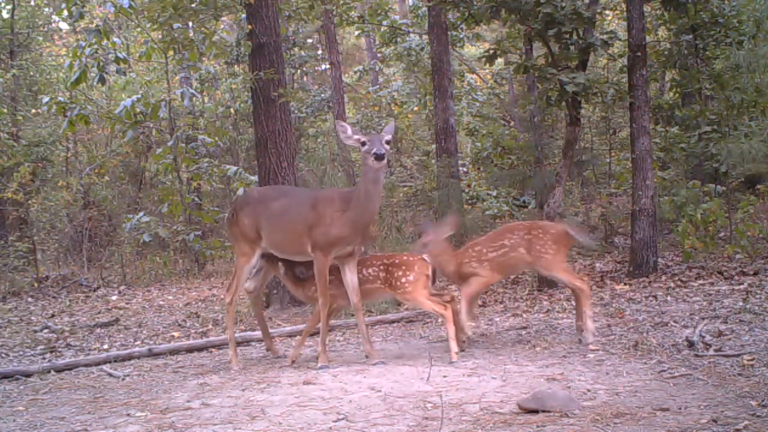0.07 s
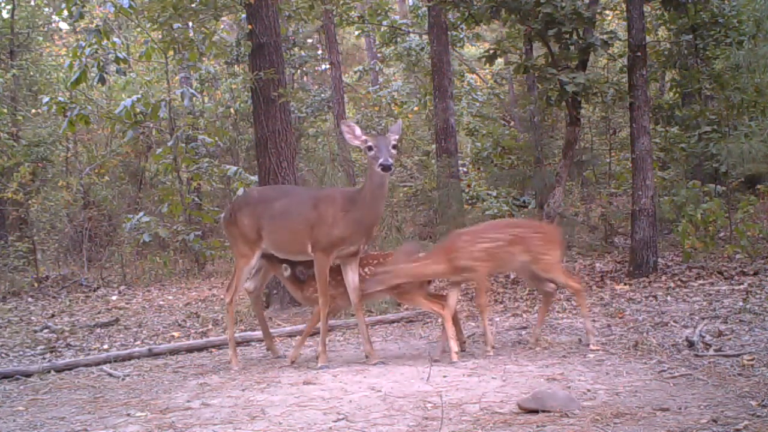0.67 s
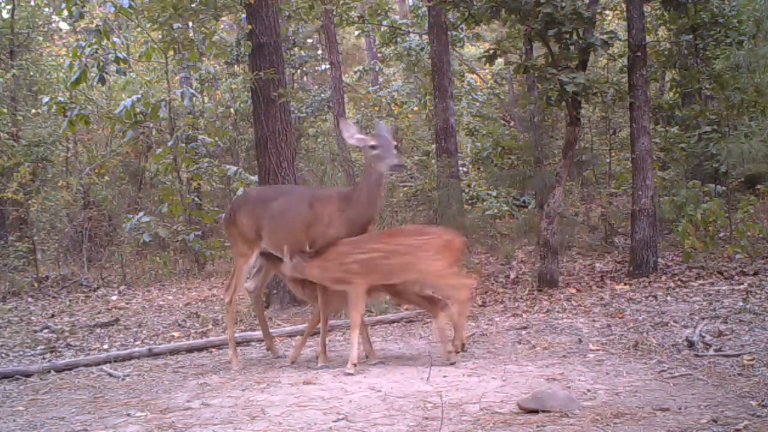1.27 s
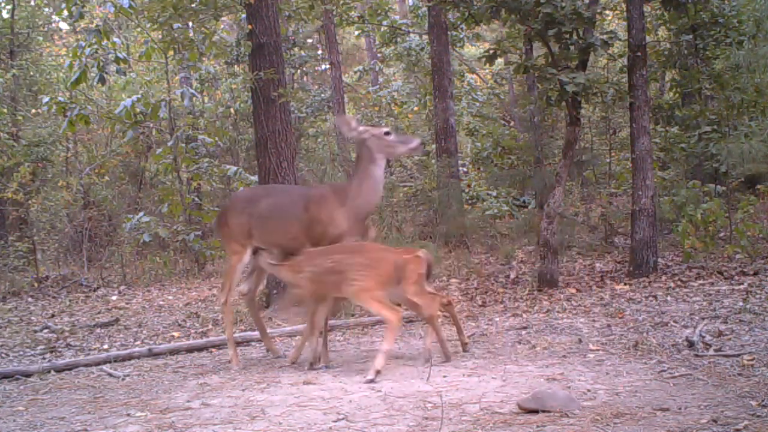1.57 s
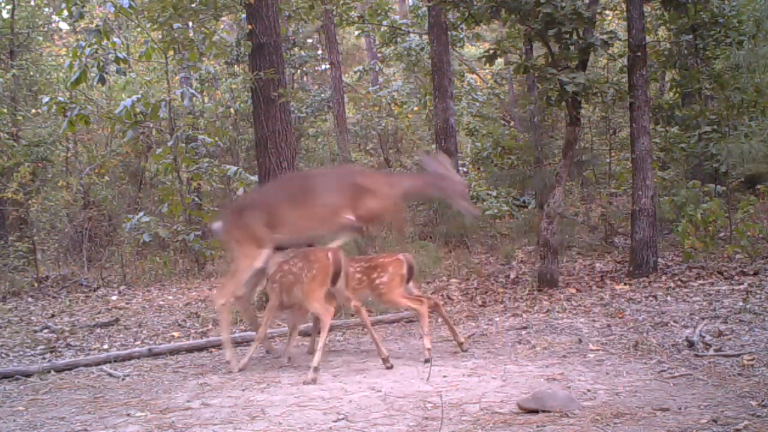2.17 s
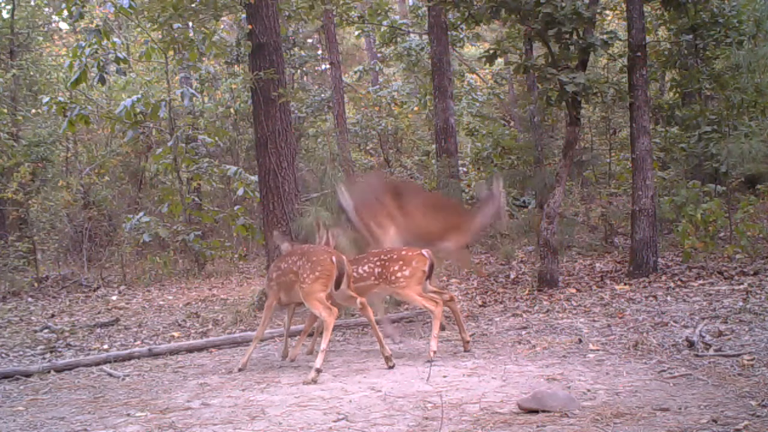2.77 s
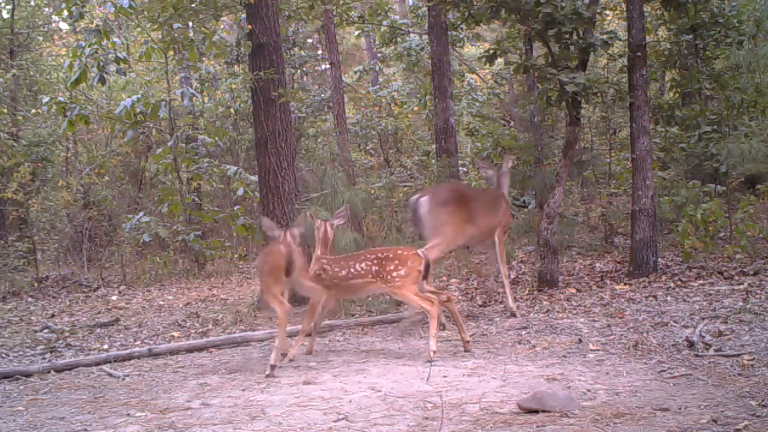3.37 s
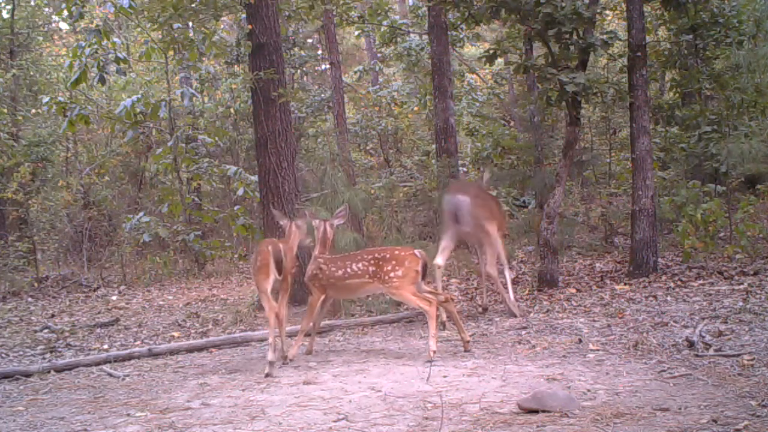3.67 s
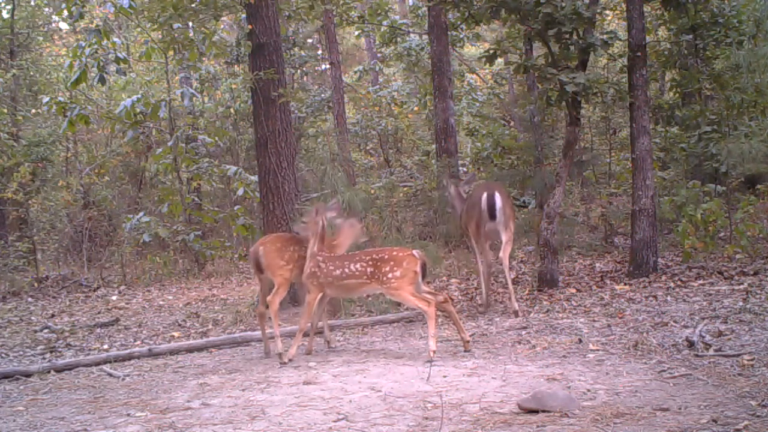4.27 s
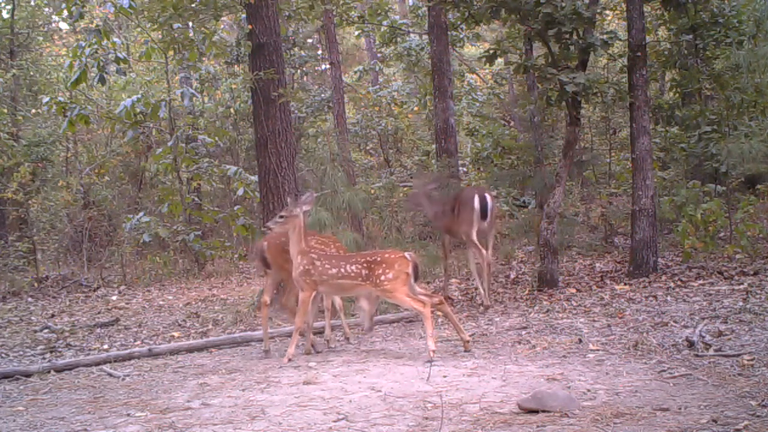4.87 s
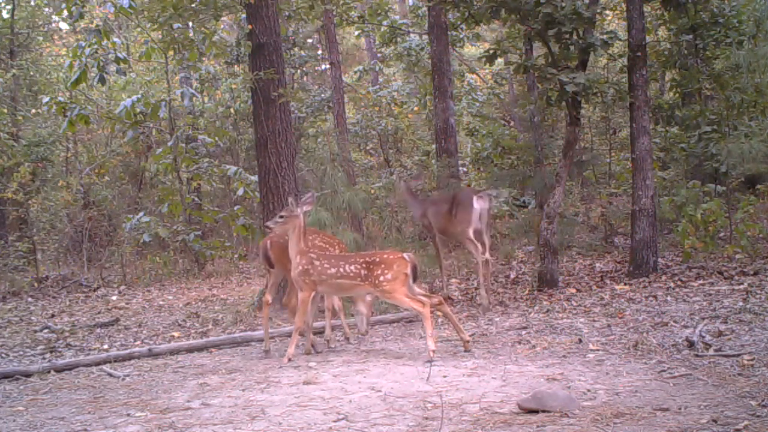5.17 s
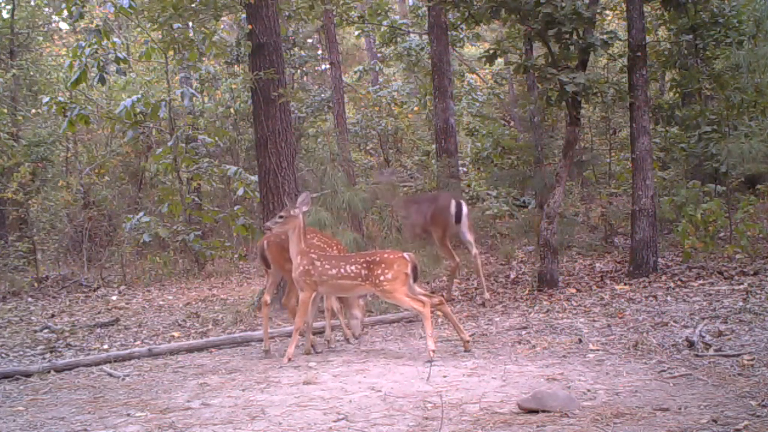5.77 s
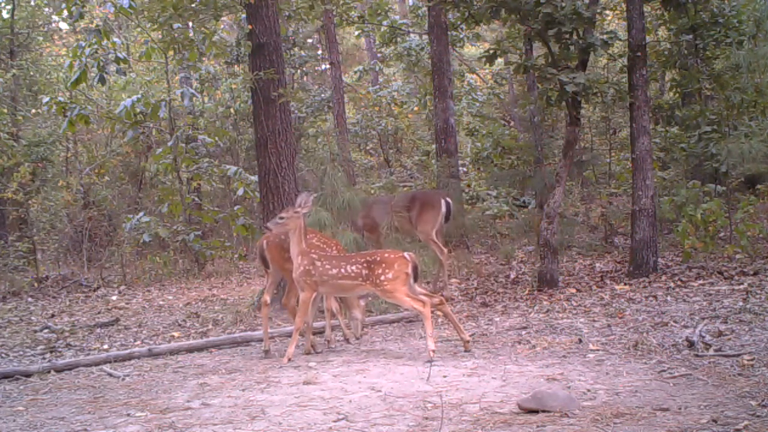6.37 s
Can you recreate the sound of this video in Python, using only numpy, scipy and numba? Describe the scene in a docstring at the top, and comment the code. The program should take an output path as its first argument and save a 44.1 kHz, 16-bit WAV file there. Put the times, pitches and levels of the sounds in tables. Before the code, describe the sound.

Nursing fawns smack softly and a doe steps through dry leaves, while a small bird chirps and a cicada pulses over woodland hiss.

```python
"""A woodland edge, heard by one distant microphone: a doe and two nursing fawns.
The fawns smack as suction lets go and mew softly; the doe steps away, crumpling dry leaves and
snapping stalks. A small bird whistles among the trunks. A cicada's buckling tymbal rings its body
in falling sweeps that grow louder, over a chorus of far insects, a low rumble and a hiss."""
import sys
import numpy as np
from scipy import signal
from scipy.fft import rfft, irfft
from scipy.io import wavfile
from scipy.ndimage import uniform_filter1d
from numba import njit

SR = 44100
rng = np.random.default_rng(int(sys.argv[2]) if len(sys.argv) > 2 else 0)


def log_audio(samples):
    """Write samples as a 16-bit WAV file to the path given in sys.argv[1]."""
    # one column per channel
    frames = np.atleast_2d(samples).T
    # limit to full scale, then quantise
    limited = np.clip(frames, -1, 1)
    pcm = np.round(limited * 32767).astype(np.int16)
    wavfile.write(sys.argv[1], SR, pcm)


N = 287973
T = np.arange(N) / SR
TOP_HZ = 15700


def undb(db):
    """Decibels to gain."""
    return 10 ** (np.asarray(db) / 20)


def unit(x):
    """Scale to rms 1."""
    return x / np.sqrt(np.mean(x ** 2))


def colour(x, spectrum):
    """Shape x by (f/Hz, gain/dB) points, rolled off below the first; rms 1."""
    hz, db = np.transpose(spectrum)
    bins_hz = np.arange(N // 2 + 1) * SR / N + 1e-3
    gain = undb(np.interp(np.log(bins_hz), np.log(hz), db))
    rolloff = np.minimum(bins_hz / hz[0], 1) ** 2
    return unit(irfft(rfft(x) * gain * rolloff, N))


def wander(rate_hz):
    """Random values joined by ramps; rms 1."""
    span = int(SR / rate_hz)
    stairs = np.repeat(rng.standard_normal(N // span + 1), span)
    return unit(uniform_filter1d(stairs, span)[:N])


@njit
def bandpass(x, hz, width_hz):
    """State-variable band-pass with a centre per sample."""
    y, band, low = np.empty(len(x)), 0., 0.
    for i in range(len(x)):
        g, damping = np.tan(np.pi * hz[i] / SR), width_hz / hz[i]
        v = (band + g * (x[i] + 1e-18 - low)) / (1 + g * (g + damping))
        band, low = 2 * v - band, low + 2 * g * v
        y[i] = damping * v
    return y


def resonate(x, hz, width_hz):
    """Steep resonance, steady or moving: two band-passes in series, each width_hz wide."""
    centre_hz = np.full(len(x), hz, dtype=float)
    once = bandpass(x, centre_hz, float(width_hz))
    return bandpass(once, centre_hz, float(width_hz))


def add_burst(out, start_s, peak_db, burst):
    """Mix a burst into out, scaled to peak_db."""
    i = int(start_s * SR)
    out[i:i + len(burst)] += undb(peak_db) * burst[:N - i] / np.abs(burst).max()


def swells(rows):
    """Gain of Gaussian swells summed in power; rows: peak t/s, level/dB, rise/s, fall/s."""
    power = np.zeros(N)
    for peak_s, db, rise_s, fall_s in rows:
        distance = (T - peak_s) / np.where(T < peak_s, rise_s, fall_s)
        power += undb(2 * db) * np.exp(-np.minimum(distance ** 2, 40))
    return np.sqrt(power)


def fade_db(age_s, hold_s, sag_db_per_s, release_db_per_s):
    """Level of a note that sags while held, then drops fast."""
    return -sag_db_per_s * np.clip(age_s, 0, hold_s) - release_db_per_s * np.maximum(age_s - hold_s, 0)


def crackle(rate_hz, spread_db):
    """Clicks at random moments, a few larger than the rest."""
    size = undb(spread_db * np.minimum(rng.exponential(size=N), 4))
    return (rng.random(N) < rate_hz / SR) * size * rng.choice([-1, 1], N)


def woods(x, wet_db, t60_s):
    """Trunks and leaves add a dying wash of echoes."""
    t = T[:SR // 2]
    envelope = np.exp(-np.log(1000) * t / t60_s) * (1 - np.exp(-t / 0.0046))
    echoes = rng.standard_normal(len(t)) * envelope
    return x + undb(wet_db) * signal.fftconvolve(x, echoes / np.linalg.norm(echoes))[:N]


# Rumble spectrum: f/Hz, relative level/dB
RUMBLE_SPECTRUM = [(22, 1.6), (55, -1), (80, -6), (125, -9), (175, -15), (235, -20), (320, -26.5),
                   (500, -28), (750, -31), (1100, -34), (2000, -37), (3000, -39.5), (6000, -70)]
# Hiss spectrum: f/Hz, relative level/dB
HISS_SPECTRUM = [(1000, -26), (2400, 3.5), (6000, 5.5), (8500, 0.5), (12000, -0.5), (14500, -1),
                 (15700, -11)]


def air():
    """Still air: a low rumble and an even hiss."""
    rumble = undb(-39) * colour(rng.standard_normal(N), RUMBLE_SPECTRUM)
    hiss = undb(-58) * colour(rng.standard_normal(N), HISS_SPECTRUM)
    return rumble + hiss


# Drone envelope: t/s, level/dB
DRONE_LEVELS = [(0, -46), (2, -46.5), (3.4, -50.5), (4.3, -43), (5.6, -47), (6.2, -41.5)]
# Drone resonances: f/Hz, stage half-width/Hz, relative level/dB
DRONE_MODES = [(96.7, 16.9, 2.5), (115.5, 12.5, -3), (138.3, 14.8, -3), (210, 33, -12.5)]


def drone():
    """A far bass drone slowly sinks and swells."""
    modes = sum(undb(db) * unit(resonate(rng.standard_normal(N), hz, 2 * half_width_hz))
                for hz, half_width_hz, db in DRONE_MODES)
    times_s, levels_db = np.transpose(DRONE_LEVELS)
    return unit(modes) * undb(np.interp(T, times_s, levels_db))


# Far insect spectrum: f/Hz, relative level/dB
CHORUS_SPECTRUM = [(2500, -28), (2820, -7), (3020, -4.5), (3430, 2), (3830, -3), (4100, -2.5), (4550, -1),
                   (5100, 0.5), (5450, -2), (5750, -4), (6600, -9.5), (8000, -17)]


def chorus():
    """Far insects blur into a band of ticks; a few narrow voices swell and fade within it."""
    ticks = colour(crackle(rate_hz=14000, spread_db=1), CHORUS_SPECTRUM) * undb(0.73 * wander(25))
    voices = sum(unit(resonate(rng.standard_normal(N), hz, width_hz=90)) * undb(2 * wander(5))
                 for hz in (3102, 3473, 3670, 3860, 4057, 4166, 5130, 5430))
    steady_db, swell_from_s, swell_db_per_s = -53, 3.6, 1.34
    level_db = steady_db + swell_db_per_s * np.maximum(T - swell_from_s, 0)
    return (ticks + undb(-7) * unit(voices)) * undb(level_db)


# Cicada sweeps, about 0.8 s apart: t/s, nominal level/dB, closing hum level/dB
SWEEPS = [(.2, -71, -63), (1.04, -57, -59), (1.92, -65, -59.5), (2.72, -72, -58), (3.485, -53.5, -60),
          (4.262, -52, -58.5), (5.075, -48, -64), (5.886, -45.5, -66)]
TYMBAL_HZ, CLOSING_HUM_HZ = 182.8, 2992
SWEEP_FROM_HZ, SWEEP_TO_HZ, SLIDE_MIDDLE_S, SLIDE_S = 5480, 3810, 0.019, 0.014
SWEEP_OVERSHOOT_DB, SWEEP_ATTACK_DB_PER_S = 1, 378


def cicada():
    """A tymbal buckles in and out; its clicks ring a body whose resonance sinks, ending on a hum."""
    phase = 2 * np.pi * np.cumsum(TYMBAL_HZ * (1 + 0.0015 * wander(40))) / SR
    # In and out clicks have opposite signs, so odd harmonics lead.
    clicks = unit(sum((1 if k % 2 else 0.55) * np.cos(k * phase) for k in range(14, 33)))
    rasp = rng.standard_normal(N)
    sweeps = np.zeros(N)
    for at_s, db, _ in SWEEPS:
        active = (T > at_s - 0.1) & (T < at_s + 0.2)
        age_s = T[active] - at_s
        slide = 1 / (1 + np.exp((age_s - SLIDE_MIDDLE_S) / SLIDE_S))
        body_hz = SWEEP_TO_HZ + (SWEEP_FROM_HZ - SWEEP_TO_HZ) * slide
        hold_s = 0.1 * 2 ** ((db + 48) / 15)  # doubles per 15 dB
        effort_db = SWEEP_OVERSHOOT_DB + SWEEP_ATTACK_DB_PER_S * np.minimum(age_s, 0)
        effort_db += fade_db(age_s, hold_s, sag_db_per_s=70, release_db_per_s=450)
        # Buckling starts ragged, then locks to a steady beat.
        locked = np.clip((age_s + 0.016) / 0.056, 0, 1)
        drive = locked * clicks[active] + (1.7 - 1.3 * locked) * rasp[active]
        sweeps[active] += unit(resonate(drive, body_hz, width_hz=1360)) * undb(db + effort_db)
    low_mode = unit(resonate(clicks + 0.3 * rasp, hz=3200, width_hz=530))
    low_mode *= swells([(at_s + 0.095, db - 7, 0.03, 0.035) for at_s, db, _ in SWEEPS])
    hum_phase = 2 * np.pi * np.cumsum(CLOSING_HUM_HZ + 9 * wander(60)) / SR
    hum = unit(np.sin(hum_phase) * undb(2 * wander(40)))
    hum *= swells([(at_s + 0.24, hum_db, 0.055, 0.05) for at_s, _, hum_db in SWEEPS])
    return woods(sweeps + low_mode + hum, wet_db=-3.5, t60_s=0.45)


# Bird calls: onset t/s, level/dB, ratio to base pitch
CHIRPS = [(2.095, -44, 1.005), (3.066, -45, 0.985), (4.405, -50, 1.01), (5.125, -50.5, .985),
          (6.035, -53, 0.99)]
BASE_FROM_HZ, BASE_TO_HZ, SLUR_S, CHIRP_ATTACK_S = 5850, 7270, 0.0105, 0.0042
QUAVER_RATE_HZ, QUAVER_DEPTH_HZ = 130, 350


def bird():
    """A thin whistle slurs up and breaks into a fast quaver, smeared by the trees."""
    out = np.zeros(N)
    quaver_phase = 2 * np.pi * np.cumsum(QUAVER_RATE_HZ * (1 + 0.1346 * wander(60))) / SR
    quaver = np.sin(quaver_phase) + 0.4 * wander(400)
    for start_s, db, ratio in CHIRPS:
        age_s = np.maximum(T - start_s, 0)
        base_hz = BASE_TO_HZ + (BASE_FROM_HZ - BASE_TO_HZ) * np.exp(-age_s / SLUR_S)
        quaver_onset = np.clip((age_s - 0.012) / 0.0275, 0, 1)
        pitch_hz = ratio * base_hz + QUAVER_DEPTH_HZ * quaver_onset * quaver
        attack = np.minimum(age_s / CHIRP_ATTACK_S, 1)
        level_db = db + fade_db(age_s, hold_s=0.08, sag_db_per_s=59, release_db_per_s=380)
        out += np.sin(2 * np.pi * np.cumsum(pitch_hz) / SR) * attack * undb(level_db)
    return woods(out, wet_db=0.5, t60_s=0.7)


# Hooves on bare soil: peak t/s, level/dB, rise/s, fall/s
THUDS = [(1.97, -57.5, 0.043, 0.055), (3.49, -53.5, 0.015, 0.02)]


def hoof_thuds():
    """Packed earth answers a hoof with a dull scuff."""
    return unit(resonate(rng.standard_normal(N), hz=480, width_hz=220)) * swells(THUDS)


# Hooves on dry leaves: peak t/s, level/dB, length/s
STEPS = [(0.032, -56, 0.025), (.605, -58, .045), (.95, -59, 0.032), (1.77, -59, .07), (2.155, -54, .045),
         (2.36, -58, 0.11), (2.51, -57.5, .11), (2.944, -51, 0.039), (3.018, -54, .045), (3.438, -52, .05),
         (3.655, -54, .045), (3.705, -53, .024), (4.055, -51.5, .05), (4.288, -54, .085), (4.575, -55, .06),
         (4.655, -48.5, 0.026), (4.695, -52, .03), (4.897, -48.5, .055), (5.262, -46, 0.056),
         (5.564, -50.5, .07), (5.915, -49.5, .042), (5.985, -51.5, .07), (6.29, -54.5, .055)]
STEP_RISE_SHARE, SETTLE_AFTER_S, SETTLE_GAIN_DB, SETTLE_S = 0.45, 0.078, -11, 0.033
SHUFFLE_DB, SHUFFLE_SPREAD_DB = -71.5, 4.5


def leaves():
    """Dry leaves crumple in tiny cracks under each hoof, then settle; the fawns shuffle throughout."""
    spectrum = [(1500, -14), (4000, 1), (6500, 6), (9500, 2), (12000, 2.5), (15500, -7.5)]
    cracks = colour(crackle(rate_hz=3200, spread_db=3), spectrum)
    presses = [(at_s, db, STEP_RISE_SHARE * length_s, (1 - STEP_RISE_SHARE) * length_s)
               for at_s, db, length_s in STEPS]
    settles = [(at_s + SETTLE_AFTER_S, db + SETTLE_GAIN_DB, SETTLE_S, SETTLE_S) for at_s, db, _ in STEPS]
    shuffle = undb(SHUFFLE_DB + SHUFFLE_SPREAD_DB * wander(11))
    gain = np.hypot(swells(presses + settles), shuffle)
    return woods(cracks * gain, wet_db=-11.5, t60_s=0.4)


# Dry stalks breaking: onset t/s, peak level/dB, centre f/Hz
SNAPS = [(.162, -39.5, 7600), (.5835, -34, 7500), (1.9655, -31.5, 6200), (2.4464, -38, 13400),
         (4.1195, -32, 7400), (4.32, -35.5, 8000), (4.647, -39, 9900), (4.7376, -40, 9500),
         (4.788, -41, 10940), (5.863, -42, 12500), (5.898, -34, 8900)]


def stalk_snaps():
    """A stalk gives way fibre by fibre, in a burst of a few milliseconds."""
    out, t = np.zeros(N), T[:SR // 30]
    envelope = np.exp(-t / 0.0012) * (1 - np.exp(-t / 0.001))
    for start_s, db, hz in SNAPS:
        fibres = rng.standard_normal(len(t)) * envelope
        add_burst(out, start_s, db, resonate(fibres, hz, width_hz=7000))
    return woods(out, wet_db=-4.5, t60_s=0.25)


# Mouth cavity resonances: base f/Hz, stage half-width/Hz, gain/dB
MOUTH_MODES = [(1500, 320, -0.5), (2180, 350, 3), (3320, 440, -2)]


def mouth(x, ratio):
    """A small muzzle's resonances, tuned by ratio and summed with alternating signs."""
    return sum((-1) ** k * undb(db) * resonate(x, ratio * hz, 2 * half_width_hz)
               for k, (hz, half_width_hz, db) in enumerate(MOUTH_MODES))


# Faint mews: peak t/s, level/dB, f/Hz, half-length/s
MEWS = [(0.219, -54.5, 1208, 0.01), (2.553, -61, 1500, .025)]


def mews():
    """A fawn's thin voice: two harmonics on a wavering pitch."""
    out = np.zeros(N)
    waver = 1 + 0.035 * wander(250)
    for at_s, db, hz, half_s in MEWS:
        phase = 2 * np.pi * np.cumsum(hz * waver) / SR
        voice = unit(np.sin(phase) + 0.29 * np.sin(2 * phase))
        out += voice * swells([(at_s, db, half_s, half_s)])
    return out


# Sucking and slipping off the teat: peak t/s, level/dB, half-length/s
SUCKS = [(.24, -60, .033), (.96, -61, .022), (1.83, -59.5, .11), (1.969, -48.5, .014), (1.995, -47.5, .015),
         (2.36, -59.5, .037), (2.56, -60.5, 0.023), (2.988, -62, .037)]


def sucks():
    """Spit crackles in the mouth, swelling and fading evenly."""
    spit = unit(mouth(crackle(rate_hz=2200, spread_db=5), ratio=0.92))
    return spit * swells([(at_s, db, half_s, half_s) for at_s, db, half_s in SUCKS])


# Wet smacks: onset t/s, peak level/dB, mouth tuning ratio
SMACKS = [(.4504, -42, 1.3), (0.5847, -37.5, 1.1), (1.9595, -31, 0.93), (1.978, -23.3, 0.99),
          (2.0621, -32.5, 0.68), (2.372, -36, 1.33), (2.7435, -36, 1.4)]


def smacks():
    """Suction lets go in a sharp click that rings the mouth."""
    out, t = np.zeros(N), T[:SR // 30]
    for start_s, db, ratio in SMACKS:
        click = (t == 0) + 0.05 * rng.standard_normal(len(t)) * np.exp(-t / 0.003)
        add_burst(out, start_s, db, mouth(click, ratio))
    return out


def scene():
    """All sources at one microphone, the same in both channels."""
    background = air() + drone() + chorus()
    doe = hoof_thuds() + leaves() + stalk_snaps()
    fawns = woods(mews() + sucks() + smacks(), wet_db=-10.5, t60_s=0.14)
    return np.tile(background + cicada() + bird() + doe + fawns, (2, 1))


def record(dry):
    """A steep low-pass cuts the top treble."""
    return signal.sosfilt(signal.ellip(12, 0.1, 70, TOP_HZ, fs=SR, output="sos"), dry)


dry = scene()
out = record(dry)
log_audio(out)
```